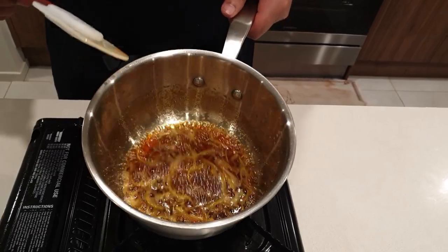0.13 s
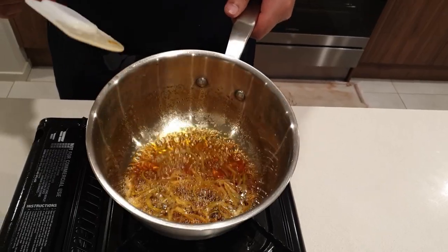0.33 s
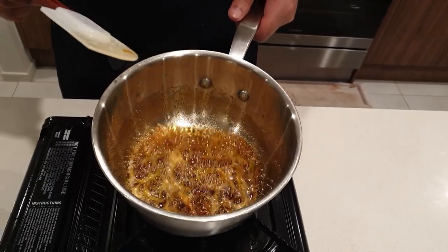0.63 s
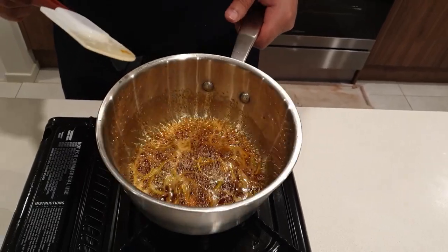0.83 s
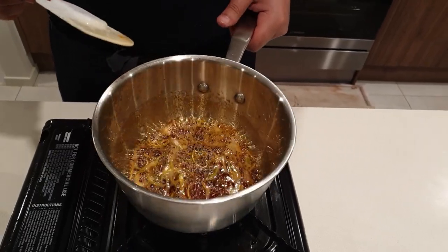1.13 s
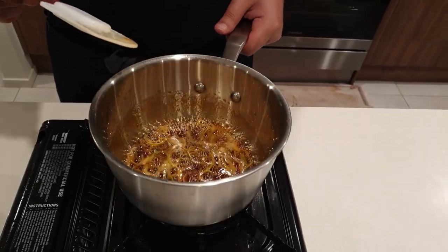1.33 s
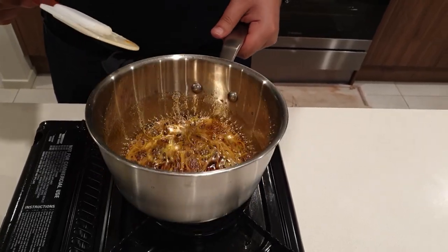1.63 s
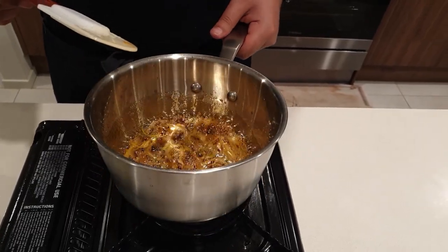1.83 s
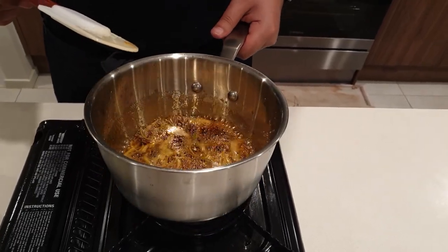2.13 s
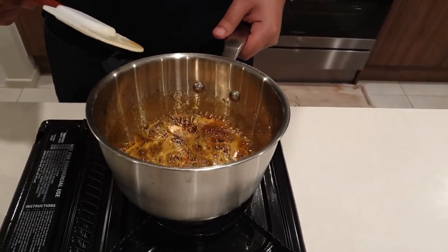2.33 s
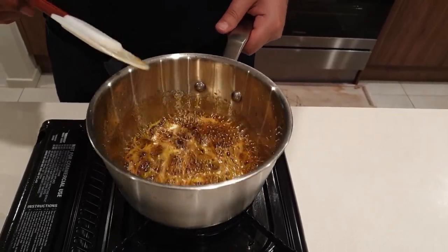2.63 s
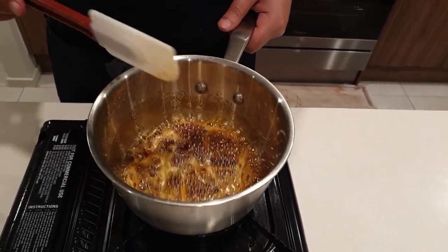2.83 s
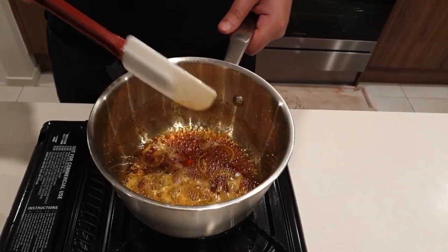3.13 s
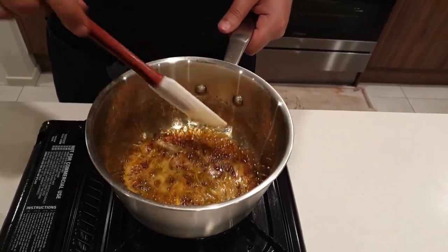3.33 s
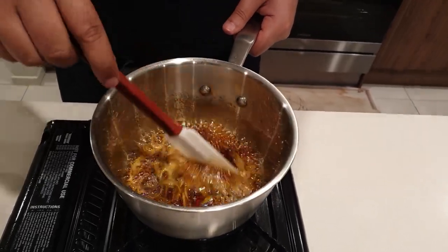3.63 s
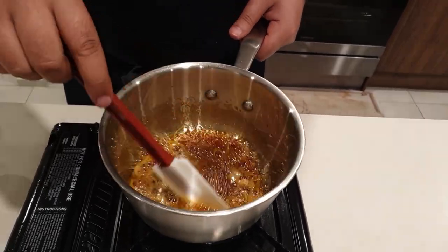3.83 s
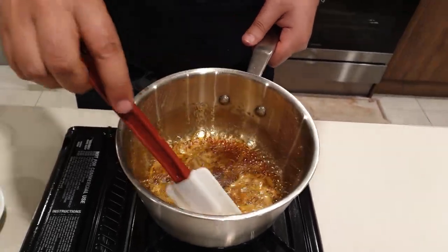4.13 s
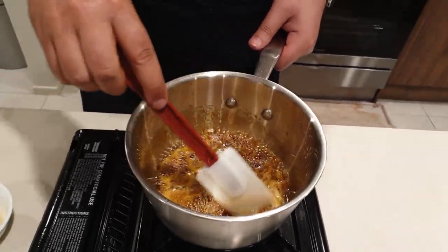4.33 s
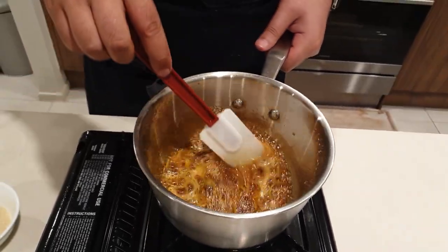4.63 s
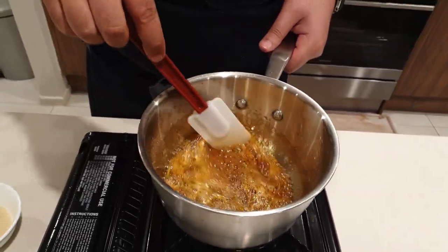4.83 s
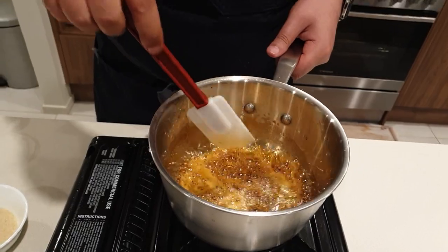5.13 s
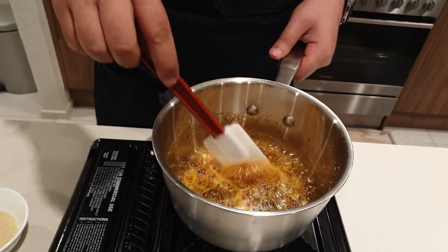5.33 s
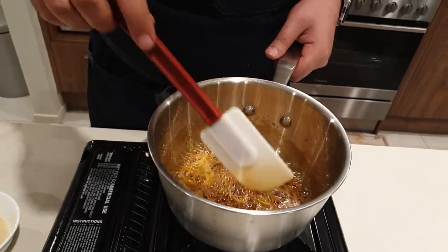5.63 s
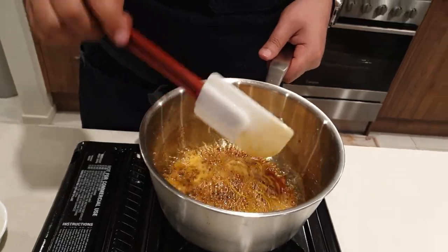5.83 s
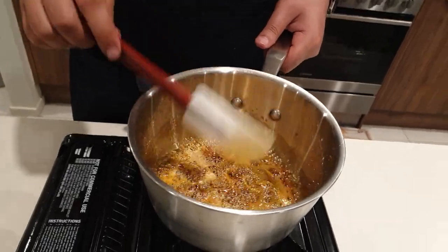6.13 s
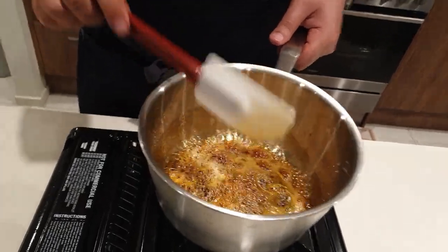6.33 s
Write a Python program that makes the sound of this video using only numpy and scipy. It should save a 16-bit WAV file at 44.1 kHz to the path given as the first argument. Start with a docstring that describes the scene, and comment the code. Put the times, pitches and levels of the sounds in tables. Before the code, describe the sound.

A quiet, continuous bed of bubbling, frying and fine hiss comes from a metal pot on a burner, heard closely in a small, lightly reverberant kitchen. Dull pan knocks interrupt it early and midway, with small spits and bubble pops. Stirring adds brief sticky crackles. The last half second brings a damped thud and three hard, clanging raps on the steel rim.

```python
"""Sugar glaze boils and sizzles in a steel saucepan over the low rush of a gas burner, in a small kitchen.
Random bubble ticks sound the pan's air, fry and hiss; tilting the pan makes the sizzle swell and sink.
The pan bumps on its support, made of dull noise and low steel tones. Glaze spits, large bubbles pop and the
pan bumps again. A silicone spatula then stirs, adding crackle made of tiny bursts. Near the end it
thuds on the wall with damped tones, and its handle raps the rim three times with noise and ringing tones."""
import sys
import numpy as np
from scipy import signal
from scipy.fft import rfft, irfft, next_fast_len
from scipy.io import wavfile
from scipy.ndimage import map_coordinates

SR = 44100
rng = np.random.default_rng(int(sys.argv[2]) if len(sys.argv) > 2 else 0)


def pcm_store(signal):
    """Save signal as 16-bit PCM."""
    levels = np.round(np.clip(np.atleast_2d(signal), -1, 1) * 32767)
    wavfile.write(sys.argv[1], SR, levels.astype(np.int16).T)


N = 285327

# How hard the glaze boils. Each row: time in seconds, strength in dB.
BOIL_STRENGTH = [(0, -52.5), (0.45, -52.5), (0.8, -56), (1.25, -55), (1.55, -55.5), (1.82, -54),
                 (2.05, -51), (2.42, -51.5), (2.75, -49), (3.05, -52), (3.45, -51), (4.1, -50),
                 (4.75, -48.5), (5.15, -50.5), (5.45, -49), (5.7, -51.5)]
STEADY_DB = -51  # strength of a steady boil
# Each layer in a steady boil: level in dB before other lifts, dB gained per dB of strength.
BIG_BUBBLES, SMALL_BUBBLES, FRY, SPRAY, RUSH = (-51.5, 0.96), (-55.7, 1.35), (-57.5, 0.59), (-55, 0.82), (-55.5, 0.92)
# Tone colour of the burner. Each row: frequency in Hz, relative level in dB per Hz.
BURNER_COLOUR = [(20, -56), (40, -2.5), (70, 2), (130, 1), (210, 0.5), (340, -9.5), (600, -20.5),
                 (2000, -9.5), (8000, -49)]
# Tone colour of small bursting bubbles. Each row: frequency in Hz, relative level in dB per Hz.
FRYING_COLOUR = [(500, -11.5), (1000, -11.5), (1750, -8), (2050, -7), (2330, 2.5), (2500, -2.5),
                 (2680, 0.5), (2850, -2), (3080, -.5), (3500, -5.5), (4200, -6.5), (6000, -21),
                 (9000, -22.5)]
# Tone colour of the finest spray. Each row: frequency in Hz, relative level in dB per Hz.
SIZZLE_COLOUR = [(1200, -27), (3000, -6), (5500, -4), (7700, -7.5), (9300, -4), (10800, -1), (13500, -5),
                 (15800, -6.5)]
# Air resonances sounded by big bubbles. Each row: centre in Hz, width in Hz, relative level in dB.
DEEP_AIR = [(548.6, 83, 1), (707, 100, 2), (817.4, 85, -1), (1100, 166, -13)]
# Air resonances sounded by small bubbles. Each row: centre in Hz, width in Hz, relative level in dB.
SHALLOW_AIR = [(1036, 330, -12.5), (1387, 136, 0), (1551, 131, 0.5), (1790, 320, -13)]
# The pan tilts and glaze runs over bare hot steel. Each row: crest in seconds, half width in seconds,
# bubbling lift in dB, frying lift in dB, sizzle lift in dB.
SLOSHES = [(0.43, 0.25, 3, 5.5, 8), (1.28, 0.081, 1, 3.5, 0), (2.01, .05, 2, 4, 0),
           (3.25, 0.28, 1.5, 6.5, 4.5), (4.0, .28, -0.5, 5, 0.4), (4.88, 0.11, 0.5, 0, 2.5),
           (5.85, .13, -0.5, -1.5, 2)]
# The blade drags through the glaze. Each row: start in seconds, length in seconds, big bubble lift in dB,
# small bubble lift in dB, crackle level in dB, crackle centre in Hz.
DRAGS = [(3.49, 0.13, 3.5, 9.5, -51, 2300), (3.615, 0.18, 5, 5, -58, 2300), (4.459, 0.2, 5, 0.5, -58, 1210),
         (5.276, 0.082, 5, 4, -44, 2480), (5.377, 0.092, 4, 1, -45.5, 3300)]
# The pan bumps on its support. Each row: start in seconds, relative level in dB, extra ring in dB,
# extra weight in the bass in dB.
BUMPS = [(1.0004, -22.5, 0, 5), (2.879, -22, -4, 1), (2.887, -28.5, 8, 11.5), (2.926, -33, 2, 17)]
# Tone colour of a bump, before its bass weight. Each row: frequency in Hz, relative level in dB per Hz.
BUMP_COLOUR = [(30, -26), (70, -19.5), (130, -9.5), (190, -5), (280, -5.5), (360, 3), (480, -3),
               (650, -0.5), (1000, 1.5), (1300, -8.5), (2400, -8), (3600, -17), (6000, -20.5), (14000, -33)]
# The steel pan's ringing tones. Each row: frequency in Hz, relative level in dB,
# seconds to fade by 60 dB when left to ring.
STEEL_MODES = [(184, -16.0, 0.36), (325, -13, 0.3), (357, -11.0, 0.33), (479, -18.0, 0.3),
               (678, -10.0, 0.36), (828, -12.0, 0.33), (1027, -12.0, 0.36), (1081, -14.0, 0.36),
               (1525, -9, 0.25), (1588, -6.0, 0.36), (2470, -15.0, 0.5), (3457, -13.0, 0.5),
               (4297, -18.0, 0.59), (4857, -8.0, 0.3), (4992, -7.0, 0.34), (5175, -4.5, 0.37),
               (5344, -7.5, 0.44), (5667, -8.0, 0.34), (5853, -1.0, 0.24), (8345, -19.0, 0.31),
               (8646, -12.0, 0.31), (8721, -11.0, 0.26), (8817, -14.0, 0.28), (9117, -19.0, 0.32),
               (9788, -22.0, 0.3), (11423, -13.0, 0.23), (13161, -33.0, 0.39), (14260, -33.0, 0.38)]
# Short wet spits. Each row: start in seconds, relative level in dB, centre in Hz.
SPITS = [(2.546, -42, 9050), (3.168, -42, 10000), (3.586, -34.5, 4700), (3.612, -38, 5500),
         (4.818, -35, 8500), (4.883, -31.5, 7000), (5.2924, -29, 2740), (5.389, -40, 7400),
         (5.429, -35, 4000), (5.438, -31.5, 11500), (5.922, -31, 6000)]
SPIT_S = 0.031  # seconds for a spit to fade by 60 dB
# Single large bubbles burst. Each row: start in seconds, level in dB before the room is added.
POPS = [(2.696, -33), (3.647, -34), (4.644, -33), (5.389, -31)]
# The soft blade meets the wall. Each row: start in seconds, relative level in dB.
THUDS = [(5.9041, -14)]
# The wall's tones under the blade. Each row: frequency in Hz, relative level in dB, seconds to fade by 60 dB.
DAMPED_MODES = [(109, -14, 0.22), (448, 4, 0.085), (584, 4, 0.059), (737, 5, 0.072), (1315, -11, 0.13),
                (1730, -21, 0.096), (2340, -11.5, 0.058)]
# Tone colour of the thud's push. Each row: frequency in Hz, relative level in dB per Hz.
THUD_COLOUR = [(50, -18), (110, 0), (220, -3.5), (300, -17), (700, -13), (1200, -19), (2800, -19.5),
               (4000, -28), (7000, -35), (14000, -40)]
# The handle raps the rim. Each row: start in seconds, relative level in dB, favoured frequency in Hz.
RAPS = [(5.984, -4.5, 5310), (6.218, -4.5, 5850), (6.4471, -4.5, 4950)]
# Tone colour of a rap's clack. Each row: frequency in Hz, relative level in dB per Hz.
RAP_COLOUR = [(30, -48), (70, -12.5), (160, -7.5), (310, -2), (480, -3.5), (700, 0), (1200, -6.5),
              (1550, -6), (1850, -10), (3900, -13.5), (5300, -5.5), (7500, -17.5), (8700, -5.5),
              (15800, -22.5)]
# How long the kitchen's tail lasts. Each row: frequency in Hz, seconds to fade by 60 dB.
KITCHEN_FADE = [(100, 0.96), (260, 0.26), (700, 0.5), (1840, 0.43), (4850, 0.39), (12800, 0.27)]
# Tone colour of the kitchen's tail. Each row: frequency in Hz, relative level in dB.
KITCHEN_COLOUR = [(100, -1.5), (700, -0.5), (2000, 1), (5000, -4), (12000, -10)]
# Likeness of left and right at the source. Each row: frequency in Hz, likeness from 0 to 1.
SOURCE_ALIKE = [(60, 0.8), (130, 1), (290, 0.82), (640, 1), (1410, 0.98), (3100, 0.89), (6000, 0.086)]
# Likeness of left and right in the kitchen's tail. Each row: frequency in Hz, likeness from 0 to 1.
ROOM_ALIKE = [(60, .8), (130, 1), (290, 0.97), (640, 0.86), (1410, 0.045), (2500, 0.057)]
# How the pan leans to one side. Each row: frequency in Hz, left minus right in dB.
LEAN = [(100, 2.5), (400, 3), (1300, 2), (2400, 2), (4400, -1), (8000, -1), (15000, -2)]
LEFT_LEAD = .00006  # seconds by which the left channel leads the right
TOP_HZ = 15900  # upper limit of the sound


def amp(db):
    """Turn decibels into a gain."""
    return 10 ** (np.asarray(db) / 20)


def unit(x):
    """Scale to an average strength (rms) of 1."""
    return x / np.sqrt(np.mean(x ** 2) + 1e-20)


def along(points, hz):
    """Read a value between (Hz, value) points, on a log frequency axis."""
    f, v = np.transpose(points)
    return np.interp(np.log(hz + 1), np.log(f + 1), v)


def curves(rows):
    """Give one value per sample for each column after the time."""
    s, *columns = np.transpose(rows)
    return [np.interp(np.arange(N) / SR, s, column) for column in columns]


def wobble(rate):
    """Draw a smooth random curve through this many random points a second."""
    knots = rng.standard_normal(int(N * rate / SR) + 4)
    return map_coordinates(knots, [np.arange(N) * rate / SR])


def fade(t, t60):
    """Die away steadily, by 60 dB in t60 seconds."""
    return np.exp(-np.log(1000) * t / t60)


def filtered(x, response):
    """Multiply the spectrum of x by a response that depends on frequency."""
    n = x.shape[-1]
    padded = next_fast_len(n + SR // 4)
    spectrum = rfft(x, padded) * response(np.fft.rfftfreq(padded, 1 / SR))
    return irfft(spectrum, padded)[..., :n]


def coloured(x, points, size=4096):
    """Shape tone by (Hz, dB) points, with a filter that never sounds ahead of its input."""
    gain = amp(along(points, np.fft.rfftfreq(size, 1 / SR)))
    cepstrum = irfft(np.log(gain))
    # folding the cepstrum forward gives the minimum-phase filter
    cepstrum[1:size // 2] *= 2
    cepstrum[size // 2 + 1:] = 0
    impulse = irfft(np.exp(rfft(cepstrum)))
    return signal.fftconvolve(x, impulse[None], axes=1)[:, :x.shape[1]]


def spread(pair, alike=SOURCE_ALIKE):
    """Blend two unrelated signals into left and right with a chosen likeness at each frequency."""
    def mix(hz):
        angle = np.arccos(np.clip(along(alike, hz), -1, 1)) / 2
        return np.array([np.cos(angle), np.sin(angle)])
    mid, side = filtered(pair, mix)
    return np.array([mid + side, mid - side])


def noise(points, envelope):
    """Make stereo noise that follows an envelope and is then coloured."""
    white = spread(rng.standard_normal((2, len(envelope)))) * envelope
    return unit(coloured(white, points)) * np.sqrt(np.mean(envelope ** 2))


def add(track, s, sound):
    """Mix a sound into the track at s seconds."""
    part = track[:, round(s * SR):][:, :sound.shape[-1]]
    part += sound[..., :part.shape[1]]


def bursts(per_second, scatter_db, size=N):
    """Bursting bubbles make random pressure ticks of scattered strength and either sign."""
    happens = rng.random((2, size)) < per_second / SR
    strength = amp(scatter_db * np.clip(rng.standard_normal((2, size)), -2.2, 2.2))
    sign = rng.choice([-1, 1], (2, size))
    return spread(happens * strength * sign)


def cavity(modes, hz):
    """The air in the pan responds most strongly near its resonances."""
    total = 0
    for k, (centre, width, db) in enumerate(modes):
        damping = 1j * hz * width
        resonance = damping / (centre * centre - hz * hz + damping)
        total = total + (-1) ** k * amp(db) * resonance
    return total


def arch(t, length):
    """The force of a stroke rises quickly, stays broad and falls quickly."""
    return np.sqrt(np.abs(np.sin(np.pi * np.clip(t / length, 0, 1))))


def boil_level(layer):
    """A layer's level in dB follows the strength of the boil."""
    strength_db, = curves(BOIL_STRENGTH)
    db, growth = layer
    return db + growth * (strength_db - STEADY_DB)


def crackle(hz, per_second, scatter_db):
    """Half a second of tiny bursts around one pitch, scaled to rms 1."""
    band = [(hz / 4, -26), (hz / 2, -6), (hz, 0), (hz * 1.45, -6), (hz * 3, -28)]  # (Hz, dB)
    return unit(coloured(bursts(per_second, scatter_db, size=SR // 2), band))


def ring(modes, t, emphasis_db=0):
    """Fading tones reach left and right each at its own strength and phase."""
    hz, db, t60 = np.transpose(modes)
    level = amp(db + emphasis_db + 1.5 * rng.standard_normal((2, len(hz))))
    phase = rng.standard_normal(level.shape) * np.minimum(hz / 3500, .6)
    waves = np.sin(2 * np.pi * hz[:, None] * t + phase[..., None]) * fade(t, t60[:, None])
    return np.sum(level[..., None] * waves, axis=1)


def kitchen(x, wet_db):
    """The room adds a tail of fading noise, with its own fading time at each frequency."""
    white = spread(rng.standard_normal((2, SR * 3 // 4)), ROOM_ALIKE)
    hz, t, z = signal.stft(white, SR, nperseg=256)
    z = z * fade(t, along(KITCHEN_FADE, hz)[:, None]) * (1 - np.exp(-t / 0.0065))
    tail = signal.istft(z, SR, nperseg=256)[1]
    tail = coloured(tail / np.linalg.norm(tail[0]), KITCHEN_COLOUR)
    return x + amp(wet_db) * signal.fftconvolve(x, tail, axes=1)[:, :x.shape[1]]


def burner():
    """Flame and pan give a low rush of noise, which grows with the boil."""
    return noise(BURNER_COLOUR, amp(boil_level(RUSH)))


def glaze():
    """Big and small bubbles sound the pan's air, small ones also fry, and the finest spray hisses on steel."""
    t = np.arange(N) / SR
    # tilting lifts or lowers the bubbling, frying and sizzle; stirring lifts the bubbles
    tilts = [np.outer(lifts, np.exp(-((t - s) / width) ** 2)) for s, width, *lifts in SLOSHES]
    bubbling_db, frying_db, sizzle_db = sum(tilts)
    strokes = [np.outer(lifts, arch(t - s, length)) for s, length, *lifts, _, _ in DRAGS]
    big_db, small_db = sum(strokes)

    big = unit(filtered(bursts(per_second=800, scatter_db=3), lambda hz: cavity(DEEP_AIR, hz)))
    small = unit(filtered(bursts(per_second=1200, scatter_db=4), lambda hz: cavity(SHALLOW_AIR, hz)))
    frying = unit(coloured(bursts(per_second=2500, scatter_db=5.0), FRYING_COLOUR))
    sizzle = unit(coloured(bursts(per_second=7000, scatter_db=3), SIZZLE_COLOUR))

    boil = amp(boil_level(BIG_BUBBLES) + bubbling_db + big_db + 0.53 * wobble(11)) * big
    boil += amp(boil_level(SMALL_BUBBLES) + bubbling_db + small_db + 0.45 * wobble(13)) * small
    boil += amp(boil_level(FRY) + frying_db + 1.4 * wobble(18)) * frying
    boil += amp(boil_level(SPRAY) + sizzle_db + 0.57 * wobble(4.9)) * sizzle
    return kitchen(boil, wet_db=-5.0)


def bumps():
    """The loaded pan knocks dully on the burner's support and stirs mainly its low tones."""
    out, t = np.zeros((2, N)), np.arange(SR * 2 // 3) / SR
    mode_hz = np.transpose(STEEL_MODES)[0]
    # a soft knock excites high tones less: (Hz, dB)
    softness_db = along([(180, 1), (400, -1.5), (1000, -9), (3000, -29), (6000, -32)], mode_hz)
    bass = lambda hz: 1 / (1 + (hz / 260) ** 4)
    for s, db, ring_db, weight_db in BUMPS:
        colour = [(hz, level + weight_db * bass(hz)) for hz, level in BUMP_COLOUR]
        knock = noise(colour, fade(t, t60=0.048) * (1 - np.exp(-t / 0.00045)))
        add(out, s, kitchen(amp(db - 4.5) * knock, wet_db=-1))
        steel = ring(STEEL_MODES, t, softness_db + weight_db * bass(mode_hz))
        add(out, s, amp(db + ring_db - 16) * steel * (1 - np.exp(-t / 0.006)))
    return out


def spits():
    """Glaze on hot steel flashes into short spits of steam and crackles along each stroke."""
    out, t = np.zeros((2, N)), np.arange(SR // 2) / SR
    for s, length, _, _, db, hz in DRAGS:
        add(out, s, amp(db) * arch(t, length) * crackle(hz, per_second=400, scatter_db=2.5))
    for s, db, hz in SPITS:
        add(out, s, amp(db - 5.0) * fade(t, SPIT_S) * crackle(hz, per_second=6300, scatter_db=2.0))
    return kitchen(out, wet_db=-7)


def pops():
    """A large bubble bursts and rings the air in the pan once."""
    out, tick = np.zeros((2, N)), signal.unit_impulse(SR // 4)
    pop = filtered(tick, lambda hz: cavity(DEEP_AIR, hz))
    for s, db in POPS:
        add(out, s, amp(db) * pop / np.abs(pop).max())
    return kitchen(out, wet_db=-5)


def thuds():
    """Silicone pressed on the wall gives a low push and sounds a few tones, which it damps quickly."""
    out, t = np.zeros((2, N)), np.arange(SR // 2) / SR
    onset = 1 - np.exp(-t / .0007)
    for s, db in THUDS:
        wall = amp(db - 11.5) * ring(DAMPED_MODES, t) * onset
        push = amp(db - 14) * noise(THUD_COLOUR, fade(t, t60=0.1) * onset)
        add(out, s, kitchen(wall + push, wet_db=-18))
    return out


def raps():
    """The stiff handle cracks on the rim, rattles the pan on its support and leaves the steel ringing."""
    out, t = np.zeros((2, N)), np.arange(SR * 2 // 3) / SR
    mode_hz = np.transpose(STEEL_MODES)[0]
    # how the hard handle favours each tone: (Hz, dB)
    hardness_db = along([(3500, -1), (4800, 1.5), (8700, 3), (11400, 0)], mode_hz)
    onset = 1 - np.exp(-t / .001)
    contact = 1 + 3.65 * fade(t, t60=0.089)  # the ring drops fast while the handle still touches
    for s, db, favoured_hz in RAPS:
        # a sharp crack with a weaker, longer rattle
        clack = noise(RAP_COLOUR, onset * (fade(t, t60=0.016) + amp(-11.5) * fade(t, t60=0.14)))
        add(out, s, kitchen(amp(db - 2.5) * clack, wet_db=-1.5))
        # each spot on the rim favours other tones
        spot_db = 5 * np.exp(-((mode_hz - favoured_hz) / 150) ** 2)
        steel = amp(db - 22) * ring(STEEL_MODES, t, hardness_db + spot_db) * onset
        add(out, s, kitchen(steel * contact, wet_db=-15))
    return out


def scene():
    """Everything happens at the pan, which leans left except in the treble and reaches the left first."""
    stove = burner() + glaze() + bumps() + spits() + pops() + thuds() + raps()
    sides = np.array([[1], [-1]]) / 2

    def place(hz):
        level = amp(sides * along(LEAN, hz))
        return level * np.exp(2j * np.pi * hz * sides * LEFT_LEAD)
    return filtered(stove, place)


def record(dry):
    """Clip peaks at full scale, then cut steeply above the upper limit."""
    return filtered(np.clip(dry, -1, 1), lambda hz: 1 / np.sqrt(1 + (hz / TOP_HZ) ** 240))


dry = scene()
out = record(dry)
pcm_store(out)
```